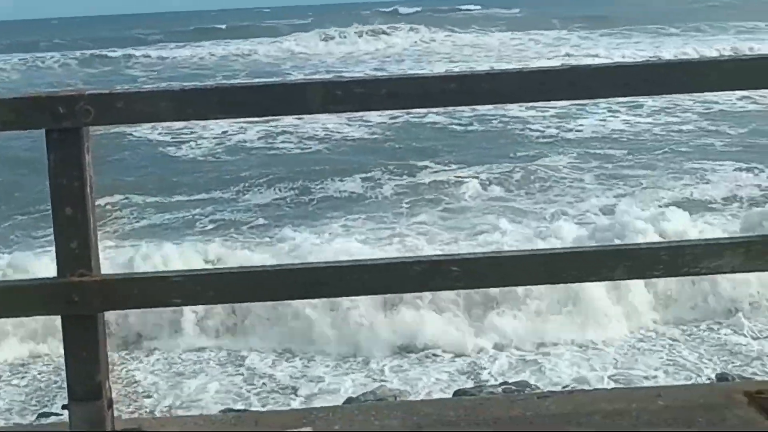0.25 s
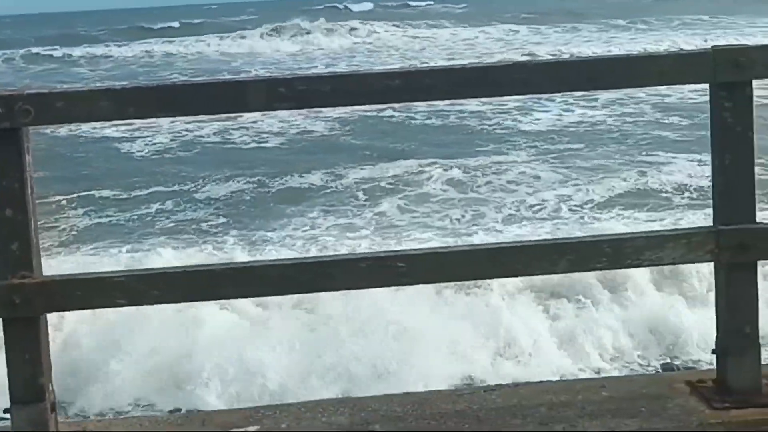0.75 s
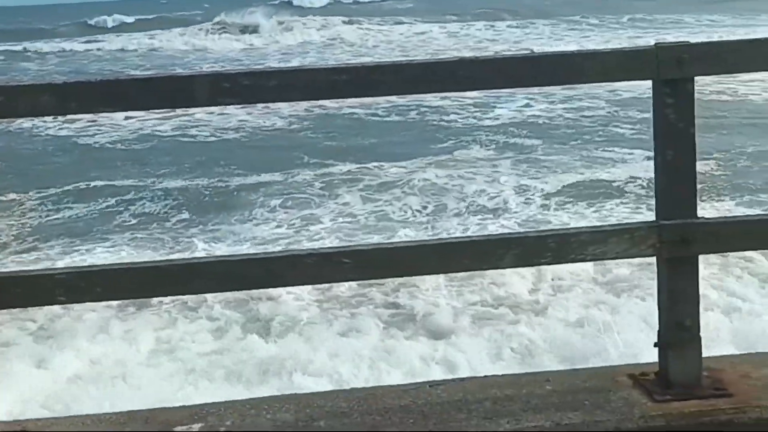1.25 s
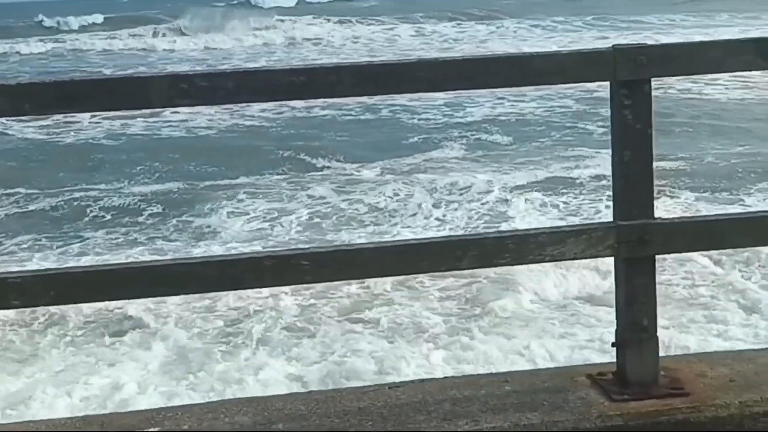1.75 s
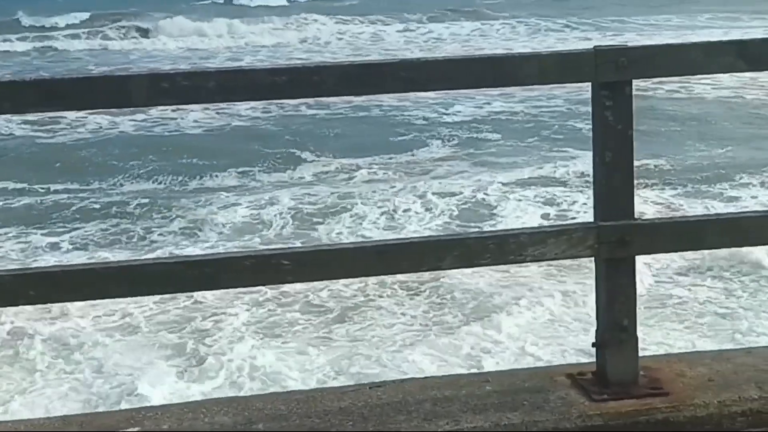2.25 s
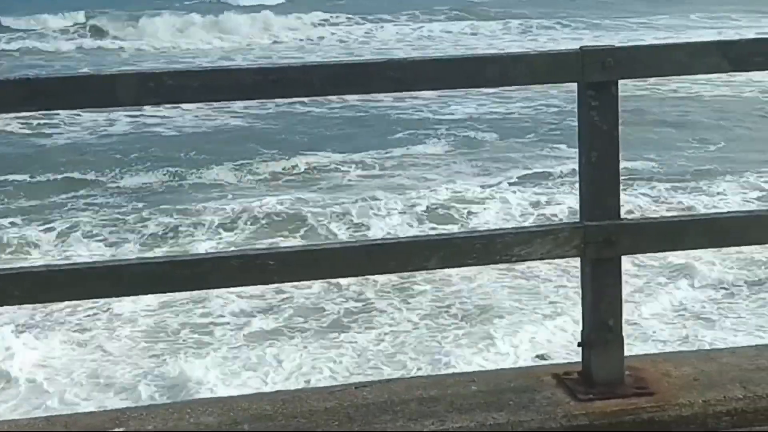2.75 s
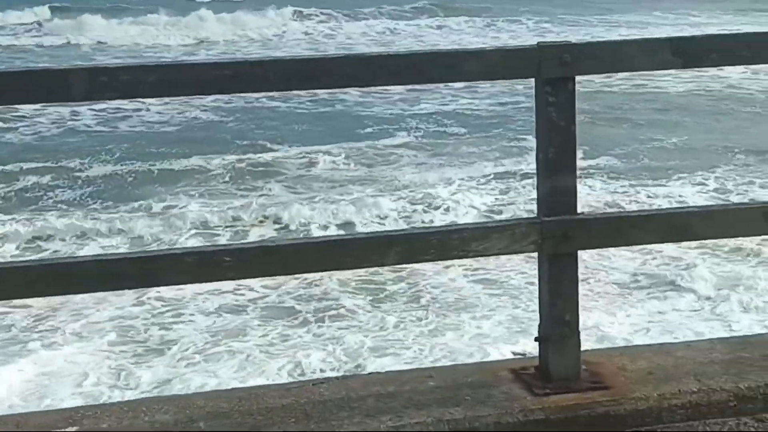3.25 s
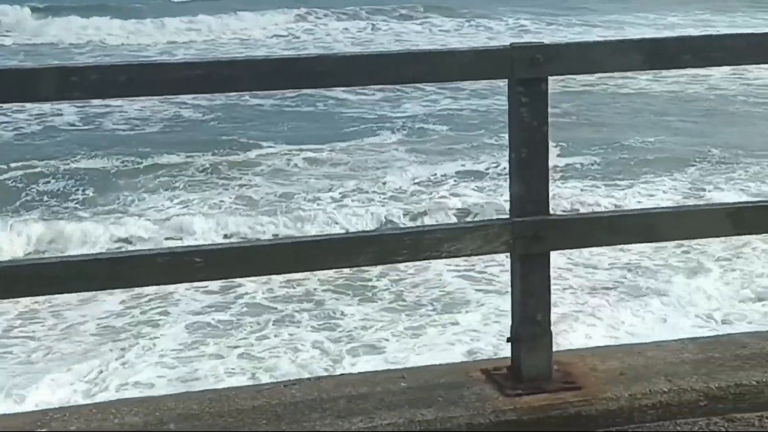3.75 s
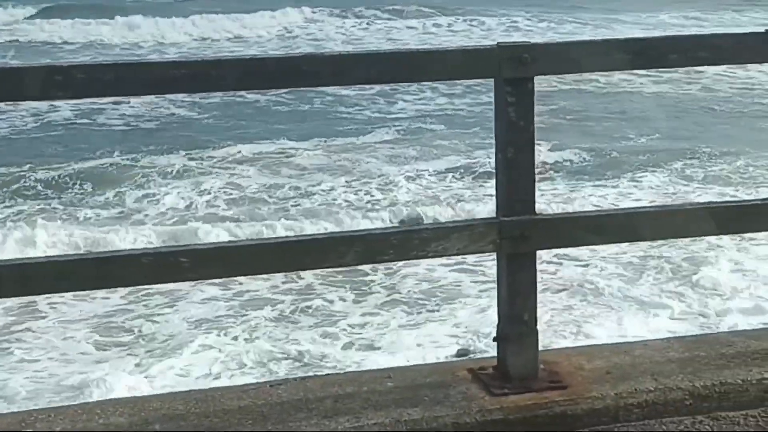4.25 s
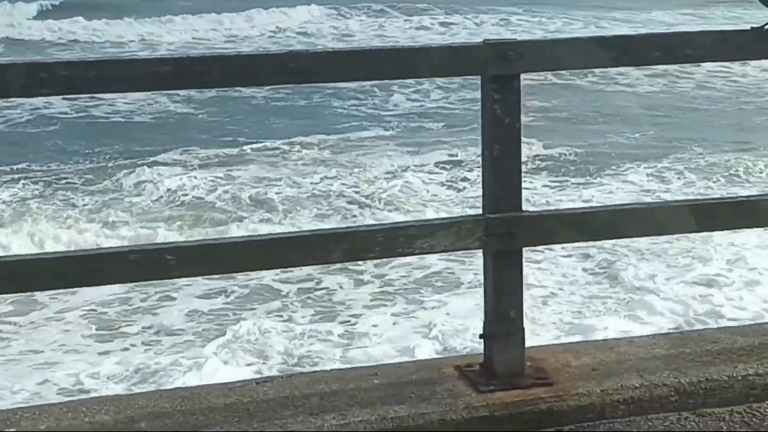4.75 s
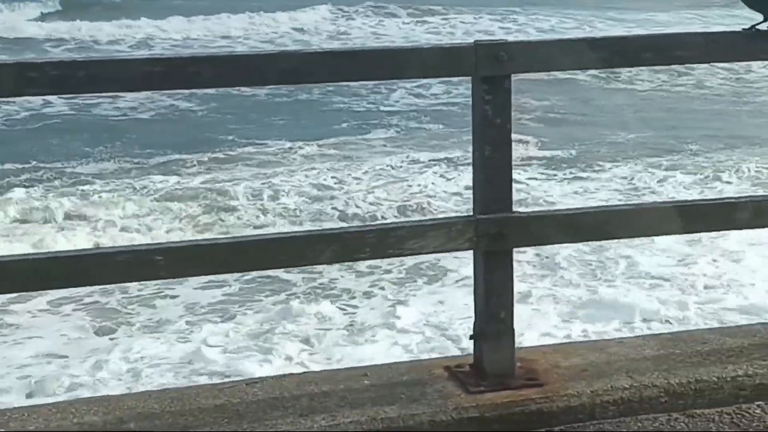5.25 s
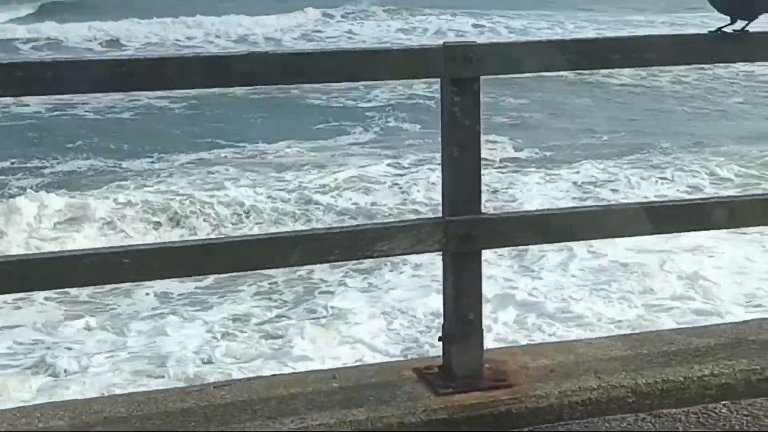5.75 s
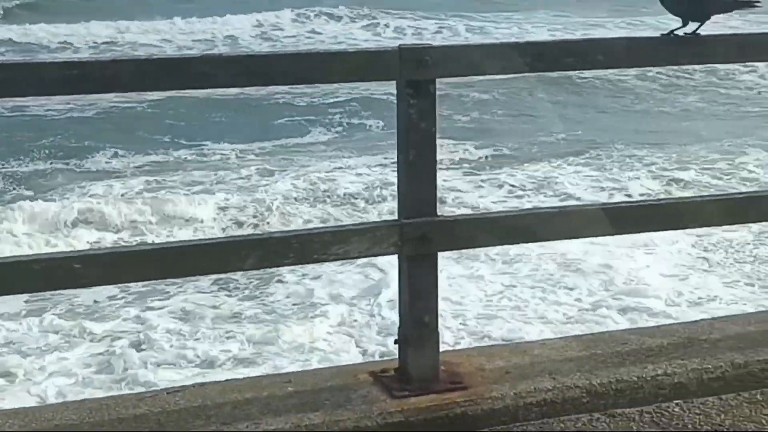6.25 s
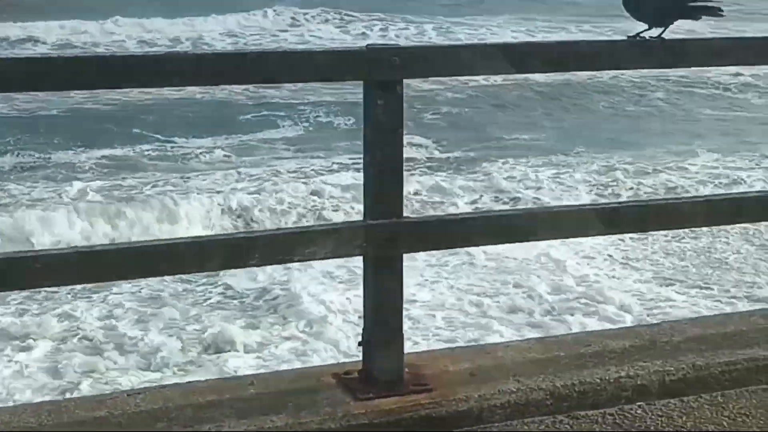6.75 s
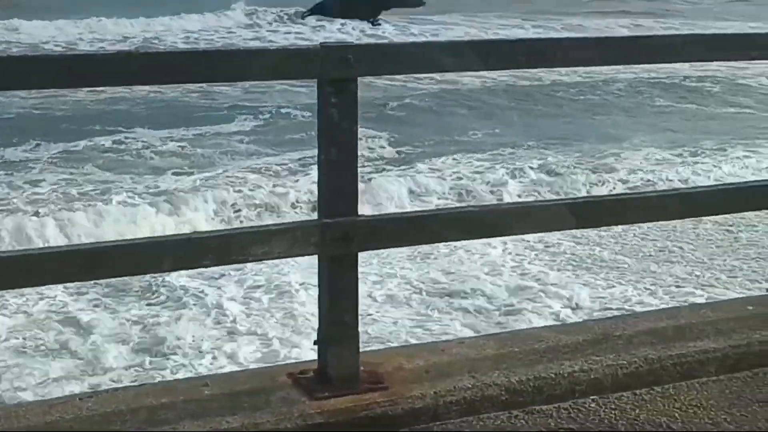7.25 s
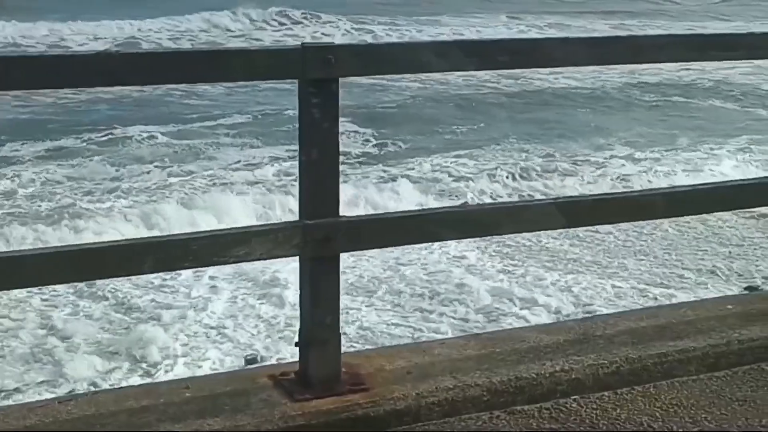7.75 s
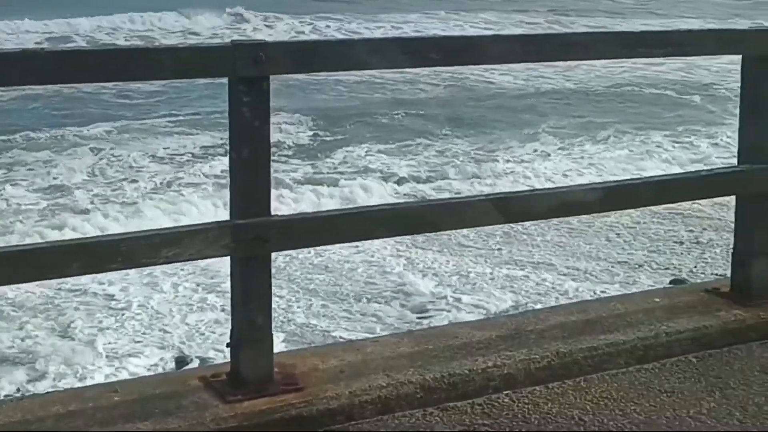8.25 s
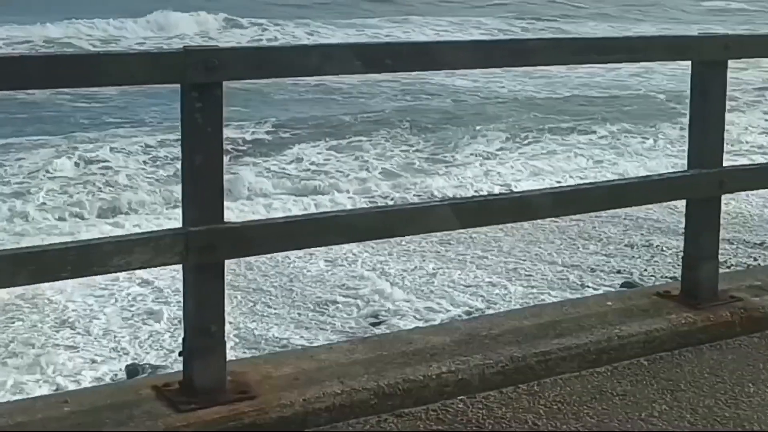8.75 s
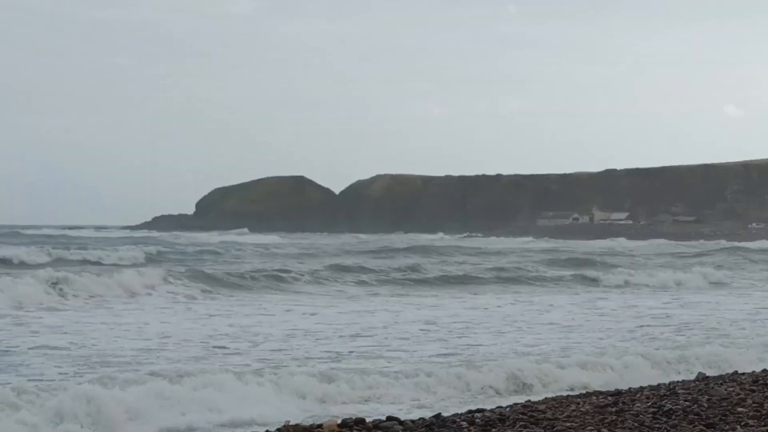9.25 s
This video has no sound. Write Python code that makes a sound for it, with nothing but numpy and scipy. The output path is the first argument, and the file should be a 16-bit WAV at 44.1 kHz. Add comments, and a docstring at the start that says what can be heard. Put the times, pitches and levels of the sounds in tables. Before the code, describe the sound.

Stormy sea breaking on a wall, heard in stereo from a sheltered hollow with short dull echoes; very heavy low end, slightly compressed at peaks. From 0 to 0.7 s dry skin-like rustling scrapes the casing over rumble and a fading hiss of broken foam. At 1.2 s a tiny high metal clink and tick, then dull knocks at about 1.3, 1.8, 2.4 and 3.0 s with scattered bright ticks. Foam drains to its thinnest near 2.6 s while the deep boom continues. Low thuds hit at 3.5 and, strongest, 3.9 s after a momentary dip. From 4 s churning wash grows, surging near 4.7, 5.4 and 6.2 s; fizz follows, becoming broad and bright by 7 s. Faint rustles and one tick occur around 6.1 to 7.5 s. A breathy hollow note, mostly left, sinks after 7 s. Full wash and rumble continue, surging at 8.6 s, then stop abruptly at 9 s.

```python
"""A deep boom of storm surf on a sea wall, heard by a two-port recorder in a sheltered hollow.
Filtered noise makes the boom and rumble, the churn, wash and fizz of draining foam, and fine spray.
A narrow resonance adds a hollow note; a hand rustles, knocks and ticks on the casing; a metal part clinks.
Close walls echo the sea, the knocks and the ticks; a limiter ducks the peaks and the sound ends abruptly."""
import sys
import numpy as np
from scipy import signal
from scipy.fft import rfft, irfft, next_fast_len
from scipy.io import wavfile
from scipy.ndimage import uniform_filter1d

SR = 44100
rng = np.random.default_rng(int(sys.argv[2]) if len(sys.argv) > 2 else 0)


def store_wav(level_fs):
    """Save 16-bit WAV to argv[1]."""
    pcm = np.round(np.clip(np.atleast_2d(level_fs), -1, 1) * 32767)
    wavfile.write(sys.argv[1], SR, pcm.T.astype(np.int16))


N = 418935
TIME_S = np.arange(N) / SR
WASH_REF_DB = -20  # drain level at which churn, fizz and note have their stated levels


def amp(db):
    """dB to gain."""
    return 10 ** (np.asarray(db) / 20)


def evened(x):
    """Scales to rms 1."""
    return x / np.sqrt(np.mean(x ** 2) + 1e-20)


def follow(points):
    """Straight-line curve through (seconds, value) points, at every sample."""
    s, value = np.transpose(points)
    return np.interp(TIME_S, s, value)


def bump(peak_s, rise_s, fall_s):
    """Straight rise to 1 at peak_s and straight fall to 0."""
    return np.interp(TIME_S, [peak_s - rise_s, peak_s, peak_s + fall_s], [0, 1, 0])


def read(points, hz):
    """Reads a spectrum on a log-frequency axis."""
    f, value = np.transpose(points)
    return np.interp(np.log(hz + 1), np.log(f + 1), value)


def resonances_db(hz, modes):
    """Summed dB lift of resonances; each falls to half its dB at half its width from the centre."""
    return sum(db / (1 + (2 * (hz - mode_hz) / width_hz) ** 2) for mode_hz, width_hz, db in modes)


def noise(colour, patchy_db, patch_hz, patch_s, lag_ms, alike=0.9, modes=()):
    """Two-port noise of rms 1 with drifting patches; the left port hears the shared part lag_ms late."""
    # Resonances of hollow and port, left then right. Each row: centre in Hz, width in Hz, lift in dB.
    ports = [
        [(172, 32, 1.5), (320, 110, 0), (406, 130, 4), (676, 71, 9), (822, 53, 5.5), (1017, 220, 5.5),
         (1545, 120, 0.5), (1677, 47, 2), (9650, 1200, 8), (10550, 920, 7.5)],
        [(258, 60, 4), (578, 216, 10), (755, 33, 7.5), (1202, 140, 4), (1400, 67, -1.5), (1660, 190, -0.5),
         (2140, 130, 2), (10500, 1200, 9), (11670, 1300, 5.5)],
    ]
    # Level of left above right. Each row: frequency in Hz, difference in dB.
    lean = [(60, 6.5), (110, 3), (200, 5.5), (380, 6.5), (700, 4), (1290, 5), (2380, 9), (4400, 1),
            (8120, 3), (15000, 3)]
    # Left-right likeness. Each row: frequency in Hz, likeness 0-1 (scaled by alike).
    likeness = [(30, .98), (100, .99), (200, .95), (330, .8), (400, .82), (470, .7), (700, .68), (900, .35),
                (1200, .48), (3000, .52), (7000, .35), (14000, .3)]
    hop, size = 256, 1024  # samples
    frames, bins = N // hop + 5, size // 2 + 1

    a, b, c, d, patches = rng.standard_normal((frames, bins, 5)).T
    patches = uniform_filter1d(patches, max(round(patch_hz * size / SR), 1), axis=0)
    patches = evened(uniform_filter1d(patches, max(round(patch_s * SR / hop), 1), axis=1))
    spectra = np.array([a + 1j * b, c + 1j * d]) * amp(patchy_db * patches)
    white = signal.istft(spectra, nperseg=size, noverlap=size - hop)[1][:, :N]

    length = next_fast_len(N)
    hz = np.fft.rfftfreq(length, 1 / SR)
    right, other = rfft(white, length)
    same = np.clip(alike * read(likeness, hz), 0, 1)
    late = np.exp(-2j * np.pi * hz * lag_ms / 1000)
    left = same * late * right + np.sqrt(1 - same ** 2) * other

    shape_db = read(colour, hz) + resonances_db(hz, modes)
    ports_db = np.array([resonances_db(hz, port) for port in ports]) + read(lean, hz) / [[2], [-2]]
    return evened(irfft(np.array([left, right]) * amp(shape_db + ports_db), length)[:, :N])


def breakers():
    """Deep boom and rumble of breakers thudding into the wall: low noise that swells and lifts."""
    # Spectra. Each row: frequency in Hz, relative density in dB per Hz.
    boom_colour, rumble_colour = [(15, -8), (27, -3.5), (39, -4.5), (50, -1), (62, 5.5), (78, 5.5),
                                  (98, 5.5), (130, -3.5), (180, -6), (300, -50.5)], [(70, -18), (130, -1.5), (180, -3), (320, -3), (450, -12.5),
                                                (700, -22), (1100, -30), (2500, -35), (6000, -63.5)]
    # Slow levels. Each row: time in seconds, level in dB.
    boom_swell, rumble_swell = [(0, -12.5), (1.8, -10), (2.3, -15.5), (3.0, -14), (3.33, -17), (4.3, -17.5),
                                (5.1, -16), (6.2, -14), (7.5, -14), (9, -15)], [(0, -16.5), (1.8, -15), (2.6, -17), (3.3, -21), (4, -18),
                                               (5.1, -20), (6.5, -16), (8.2, -12), (9, -17.5)]
    # Thuds. Each row: peak time in seconds, lift of boom in dB, lift of rumble in dB.
    thuds = [(2.47, 1.5, 0), (3.5, 5, 2.5), (3.88, 8.5, 1.5), (5.27, 1, 1), (6.05, 1, 0)]
    rise_s, fall_s = 0.1, 0.29
    lull_s, lull_half_s, lull_db = 3.68, 0.063, -7  # brief dip before the biggest thud

    dip_db = lull_db * bump(lull_s, lull_half_s, lull_half_s)
    boom_db = follow(boom_swell) + dip_db
    rumble_db = follow(rumble_swell) + dip_db
    for peak_s, boom_lift_db, rumble_lift_db in thuds:
        thud = bump(peak_s, rise_s, fall_s)
        boom_db += boom_lift_db * thud
        rumble_db += rumble_lift_db * thud

    boom = amp(boom_db) * noise(boom_colour, 1.0, 100, 0.14, 0.9, alike=0.99)
    rumble = amp(rumble_db) * noise(rumble_colour, 1.65, 200, 0.12, 0.92, alike=0.98)
    return boom + rumble


def foam_levels():
    """Wash level in dB as two curves: the slow drain of the foam and its short surges."""
    # Draining foam. Each row: time in seconds, wash level in dB.
    drain = [(0, -27.5), (.6, -32.5), (1.3, -34), (2, -36), (2.6, -41.5), (3.2, -39.5), (4.1, -29.5),
             (5, -26.5), (6, -21.5), (7, -18.5), (9, -19)]
    # Surges, negative for a dip. Each row: peak time in seconds, lift in dB.
    surges = [(.25, 1), (4.7, 4), (5.44, 2.5), (5.9, 1), (6.2, 4), (6.75, -1), (7.65, -2), (7.8, 2),
              (8.4, -1), (8.62, 3.5)]
    rise_s, fall_s = 0.11, 0.12
    return follow(drain), sum(db * bump(peak_s, rise_s, fall_s) for peak_s, db in surges)


def foam():
    """Draining foam: churn, wash and fizz are noise bands that follow one drain curve."""
    # Spectra. Each row: frequency in Hz, relative density in dB per Hz.
    churn_colour, wash_colour, fizz_colour = [(200, -29), (330, 1), (450, 7.5), (700, -1.5), (1000, -3.5),
                                              (1400, -15), (3000, -39)], [(400, -14.5), (800, -6), (1250, -3.5),
                                                             (1700, -0.5), (2600, -12), (4000, -28.5),
                                                             (8000, -54.5)], [(1500, -11.5), (2600, 2),
                                                                           (4000, -3), (5500, -8.5),
                                                                           (8000, -23), (12000, -21.5)]
    churn_ref_db, churn_db_per_db = -22, 0.39
    churn_start_db, churn_clears_s = -16.5, 1.8  # thin at first, then fills in
    fizz_ref_db, fizz_db_per_db, fizz_lag_s = -33, 1.98, 0.41  # lags the drain and swings wider
    fizz_floor_db = -45
    opening_fizz_db, opening_fizz_s = -41.5, 0.6  # the wave that has just broken

    drain_db, surge_db = foam_levels()
    swing_db = drain_db - WASH_REF_DB
    churn_db = churn_ref_db + churn_db_per_db * swing_db + surge_db
    churn_db += churn_start_db * bump(0, 1, churn_clears_s)
    late_swing_db = np.interp(TIME_S - fizz_lag_s, TIME_S, swing_db)
    fizz_gain = amp(fizz_ref_db + fizz_db_per_db * late_swing_db + surge_db)
    fizz_gain += amp(fizz_floor_db) + amp(opening_fizz_db) * bump(0, 1, opening_fizz_s)

    churn = amp(churn_db) * noise(churn_colour, 1.5, 250, 0.07, 0.98)
    wash = amp(drain_db + surge_db) * noise(wash_colour, 1.9, 500, 0.06, 1.383)
    fizz = fizz_gain * noise(fizz_colour, 1.0, 600, 0.04, 1.489)
    return churn + wash + fizz


def spray():
    """Fine spray: high noise hissing in the port resonances."""
    # Spectrum. Each row: frequency in Hz, relative density in dB per Hz.
    colour = [(1500, -19), (3500, -4.5), (6000, -5), (8000, -11), (12500, -17.5), (16000, -10)]
    # Slow level. Each row: time in seconds, level in dB.
    level = [(0, -42.5), (1.2, -35), (3, -39), (4.5, -40.5), (6.2, -43), (7.3, -38), (8, -42), (9, -45.5)]
    return amp(follow(level)) * noise(colour, 1.8, 1500, 0.04, 1.42, alike=0.72)


def hollow_note():
    """Hollow note in the wash: noise in a narrow resonance, mostly left; late on it sinks and fades."""
    ref_db, db_per_db = -31.5, 0.83
    start_hz, width_hz, sink_hz = 1542, 90, 80.8
    sinks_s, sink_time_s, fade_db_per_s = 7.0, 0.4, 2
    late_s = np.maximum(TIME_S - sinks_s, 0)
    hz = start_hz - sink_hz * np.minimum(late_s / sink_time_s, 1)
    drain_db, _ = foam_levels()
    db = ref_db + db_per_db * (drain_db - WASH_REF_DB) - fade_db_per_s * late_s

    r = np.exp(-np.pi * width_hz / SR)
    white = rng.standard_normal(N) + 1j * rng.standard_normal(N)
    slow = signal.lfilter([1], [1, -2 * r, r ** 2], white)
    tone = evened((slow * np.exp(2j * np.pi * np.cumsum(hz) / SR)).real)
    return amp(db + np.array([[3.0], [-5.0]])) * tone  # left, right


def taps(events):
    """Each tap is a burst of dying noise around its pitch, with a soft start."""
    out = np.zeros((2, N))
    t = np.arange(4096) / SR
    hz = np.fft.rfftfreq(len(t), 1 / SR)
    for start_s, db, pitch_hz, width_oct, t60_s, pan_db in events:
        burst = rng.standard_normal((2, len(t)))
        colour = np.exp(-(np.log2((hz + 1) / pitch_hz) / width_oct) ** 2)
        envelope = amp(db - 60 * t / t60_s) * np.minimum(t / (0.025 * t60_s), 1)
        tap = evened(irfft(rfft(burst) * colour)) * envelope
        at = round(start_s * SR)
        out[:, at:at + len(t)] += tap * amp([[pan_db / 2], [-pan_db / 2]])
    return out


def knocks():
    """Knocks on the casing: each sounds every part of the casing at once."""
    # Each row: start in seconds, level in dB, pitch in Hz, left above right in dB.
    hits = [(1.259, -19.5, 1000, 3), (1.811, -13, 990, 3), (2.357, -16, 860, 6), (2.967, -30.5, 1400, 12),
            (3.007, -21.5, 1100, 9)]
    # Parts of a knock. Each row: multiple of the pitch, level in dB, 1/e half-width in octaves, t60 in seconds.
    parts = [(1, 2.5, .33, 0.042), (2.1, -9.5, 0.48, .047)]
    return taps([(start_s, db + part_db, hz * multiple, width_oct, t60_s, pan_db)
                 for start_s, db, hz, pan_db in hits
                 for multiple, part_db, width_oct, t60_s in parts])


def ticks():
    """Ticks on the casing: single short bursts; narrower ones ring longer."""
    # Each row: start in seconds, level in dB, pitch in Hz, 1/e half-width in octaves, left above right in dB.
    hits = [(1.227, -22.5, 11000, .6, -1), (1.8, -28, 3900, .2, -4), (1.93, -21, 3000, 1.1, 5.5),
            (2.178, -22, 9300, 0.73, 8), (2.318, -25, 10700, .08, 1), (2.356, -23.5, 10900, .45, 11),
            (2.372, -29, 10500, .12, 2), (3.736, -30, 9600, .4, 7), (6.339, -24, 11500, .35, 7)]
    return taps([(start_s, db, hz, width_oct, 0.019 + 0.002 / width_oct, pan_db)
                 for start_s, db, hz, width_oct, pan_db in hits])


def rustle():
    """Skin slides over the casing: fine noise roughened by tiny slips."""
    # Strokes of the hand. Each row: start in seconds, hold in seconds, release in seconds, level in dB.
    strokes = [(-.02, 0.091, .1, -26), (0.151, .28, .08, -22.5), (0.521, 0.058, .12, -25),
               (6.115, 0.083, 0.065, -27), (6.26, 0.062, .1, -31), (6.368, 0.14, .25, -32),
               (6.622, 0.54, 0.37, -41)]
    # Spectrum of the skin. Each row: frequency in Hz, relative density in dB per Hz.
    colour = [(2000, 0.5), (4500, -6), (6500, -3), (8000, -4), (11000, -0.5), (13500, -4), (16000, -14.5)]
    # Rings of the casing. Each row: centre in Hz, width in Hz, lift in dB.
    casing = [(4070, 250, 2), (4920, 300, 6.5), (5920, 240, 9)]
    rise_s = 0.039
    gain = np.zeros(N)
    for start_s, hold_s, release_s, db in strokes:
        corners_s = start_s + np.cumsum([0, rise_s, hold_s, release_s])
        gain += amp(db) * np.interp(TIME_S, corners_s, [0, 1, 1, 0])
    slips_db = 0.96 * evened(uniform_filter1d(rng.standard_normal(N), size=60))
    skin = noise(colour, 0.91, 900, 0.061, 0.39, alike=0.24, modes=casing)
    return uniform_filter1d(gain, size=300) * evened(amp(slips_db) * skin)


def clink():
    """A small metal part is struck: high modes swell in within milliseconds and ring out."""
    # Each row: frequency in Hz, level in dB, t60 in seconds.
    modes = [(10600, 1, 0.044), (11300, -2, .09), (11750, -8, 0.074), (12300, -9, .05), (12820, -4, 0.14),
             (13500, -5, .12)]
    # Each row: level of one port in dB, left then right.
    port_db = [
        [-26],
        [-23],
    ]
    t = np.maximum(TIME_S - 1.226, 0)
    ring = sum(amp(db - 60 * t / t60_s) * np.sin(2 * np.pi * (hz * t + rng.random()))
               for hz, db, t60_s in modes)
    return amp(port_db) * ring * np.minimum(t / 0.003, 1)


def hollow(x):
    """Close walls throw back a short, dull cloud of echoes, a different one to each port."""
    t = np.arange(4096) / SR
    cloud = uniform_filter1d(rng.standard_normal((2, len(t))), size=4)
    cloud = cloud * amp(-60 * t / 0.06) * (t > 0.002)
    cloud = np.diff(cloud, prepend=0)  # hardly echoes the long waves of the boom
    cloud = cloud / np.linalg.norm(cloud, axis=1)[:, None]
    return x + amp(-9.0) * signal.oaconvolve(x, cloud, axes=1)[:, :N]


def scene():
    """Sea, knocks and ticks echo in the hollow; rustle and clink stay dry."""
    sea = breakers() + foam() + spray() + hollow_note()
    return hollow(sea + knocks() + ticks()) + rustle() + clink()


def record(dry):
    """One limiter for both ports ducks on peaks and recovers; fast peaks clip; then stop and band limit."""
    end_s, fade_s, edge_hz = 9.023, 0.0024, 15720
    threshold_db, share = -0.91, 0.84  # share of the overshoot taken off
    loud = dry * amp(6.0)
    peak_db = 20 * np.log10(abs(loud).max(0) + 1e-9)
    fall_db = 67.0 * TIME_S  # the peak follower falls 67 dB a second
    held_peak_db = np.maximum.accumulate(peak_db + fall_db) - fall_db
    over_db = np.maximum(held_peak_db - threshold_db, 0)
    held = np.clip(loud / amp(share * uniform_filter1d(over_db, size=40)), -1, 1)
    held = held * np.clip((end_s - TIME_S) / fade_s, 0, 1)
    lowpass = signal.firwin(1501, edge_hz, window=("kaiser", 9), fs=SR)
    return np.clip(signal.oaconvolve(held, lowpass[None], "same", axes=1), -1, 1)


dry = scene()
out = record(dry)
store_wav(out)
```